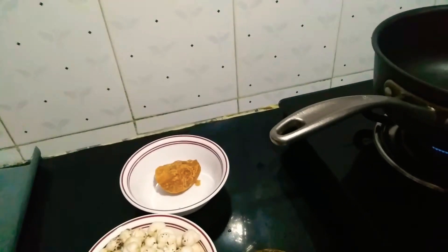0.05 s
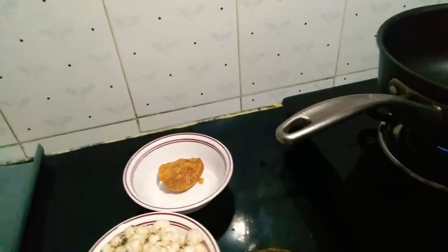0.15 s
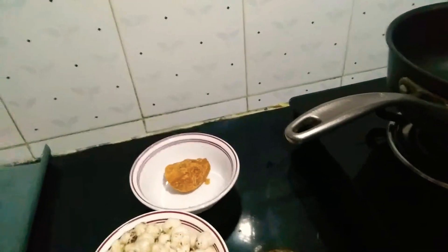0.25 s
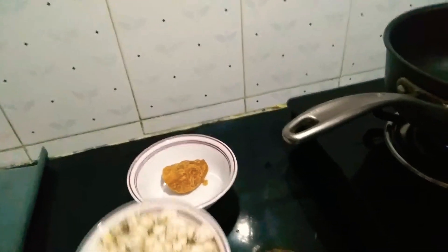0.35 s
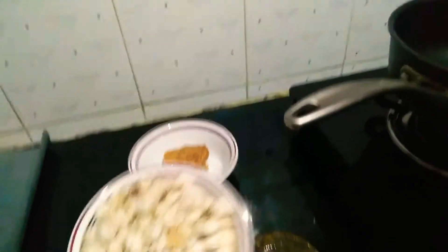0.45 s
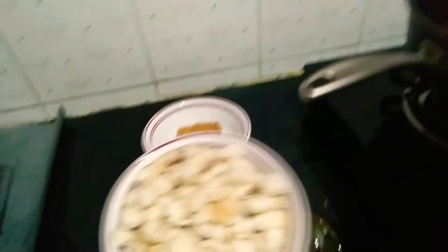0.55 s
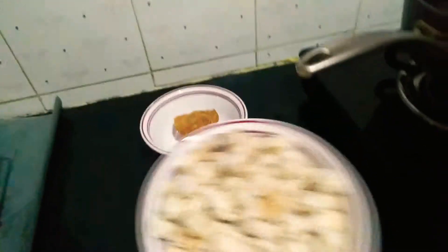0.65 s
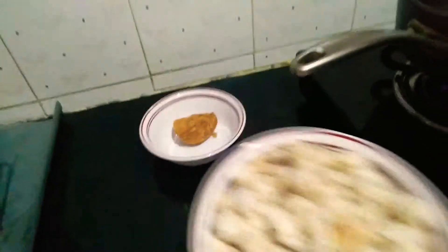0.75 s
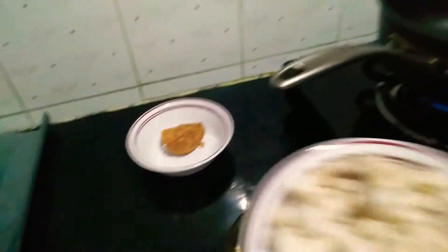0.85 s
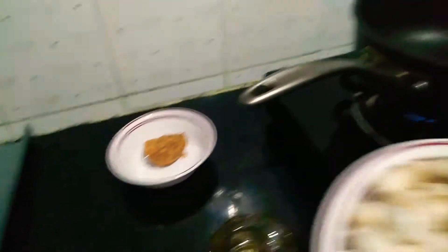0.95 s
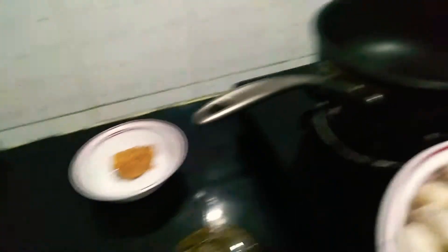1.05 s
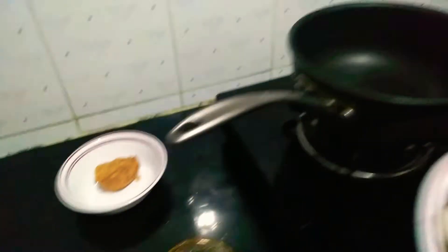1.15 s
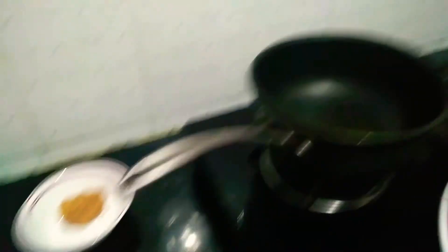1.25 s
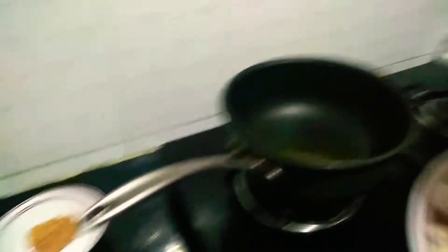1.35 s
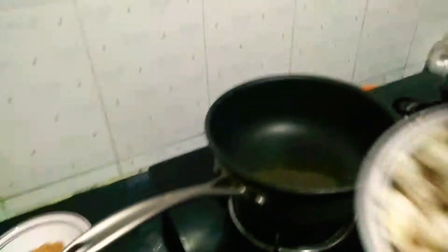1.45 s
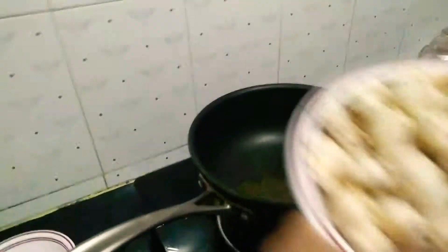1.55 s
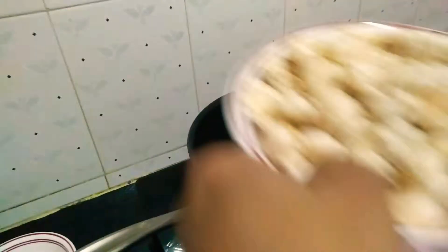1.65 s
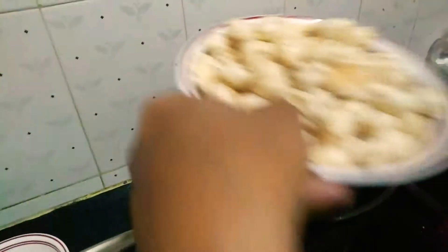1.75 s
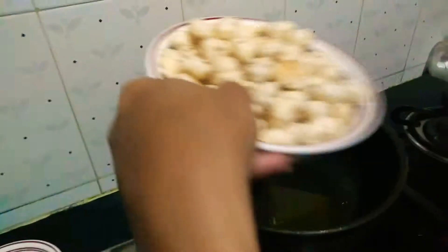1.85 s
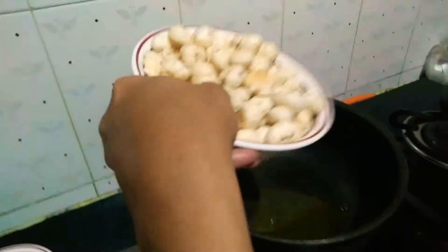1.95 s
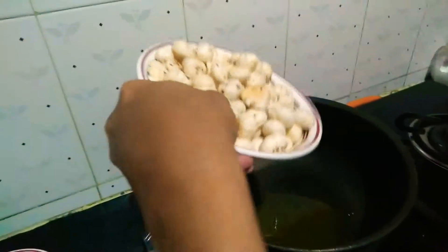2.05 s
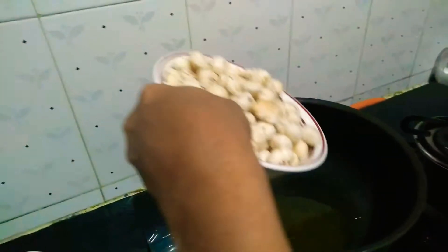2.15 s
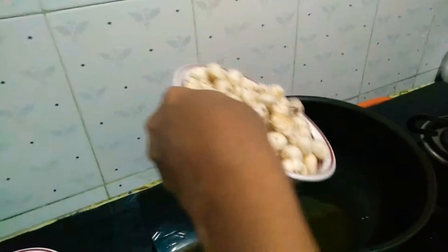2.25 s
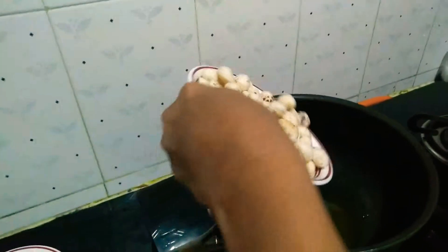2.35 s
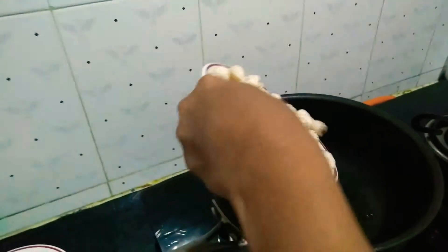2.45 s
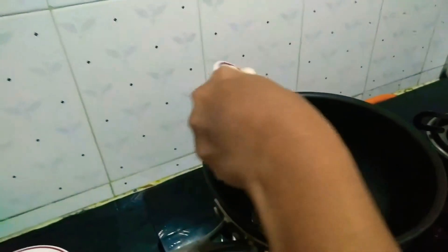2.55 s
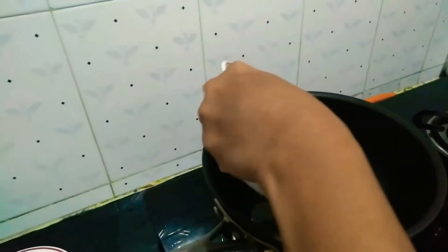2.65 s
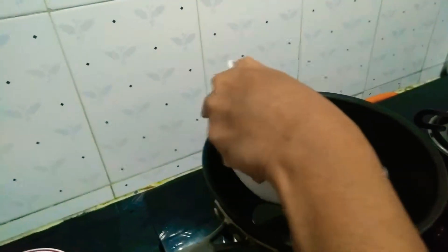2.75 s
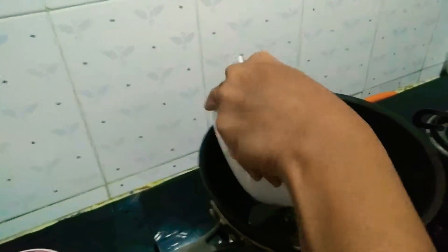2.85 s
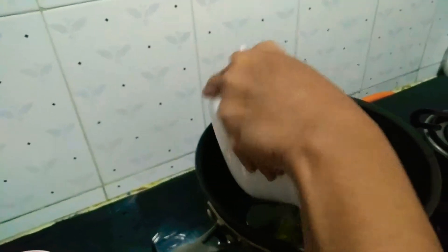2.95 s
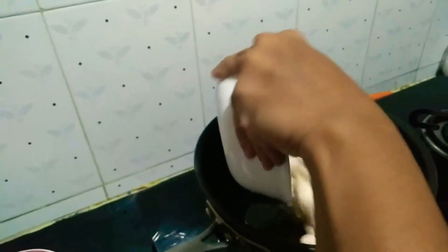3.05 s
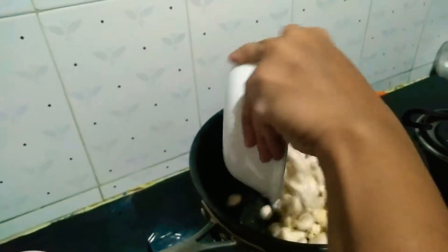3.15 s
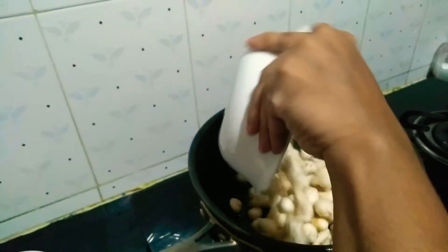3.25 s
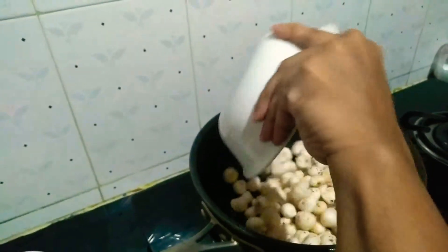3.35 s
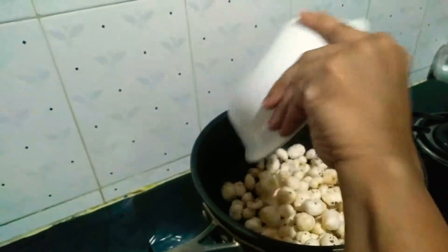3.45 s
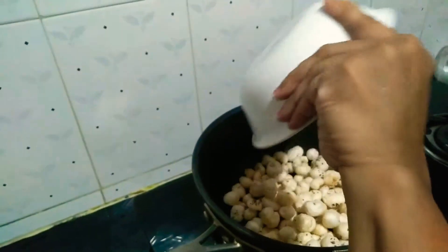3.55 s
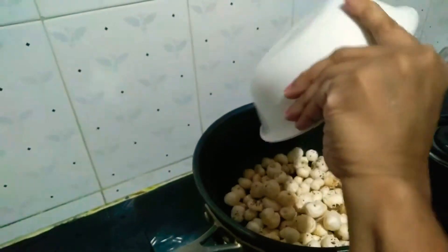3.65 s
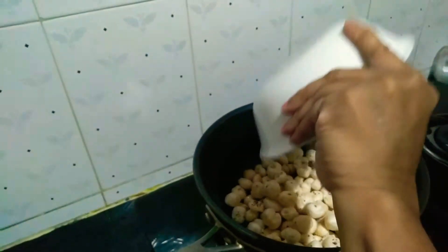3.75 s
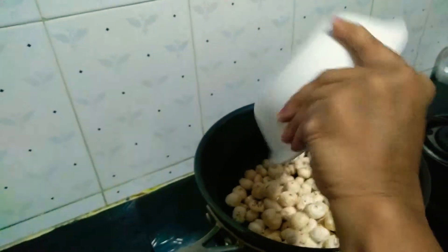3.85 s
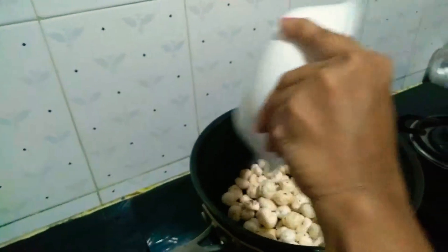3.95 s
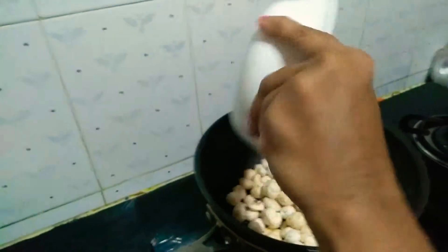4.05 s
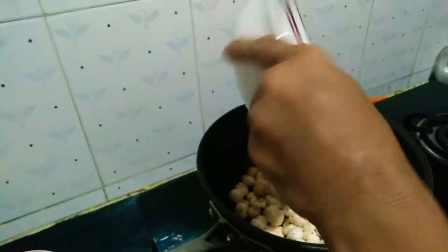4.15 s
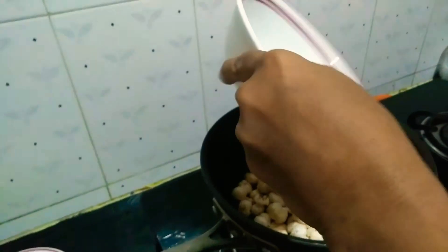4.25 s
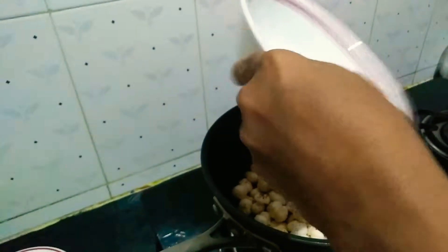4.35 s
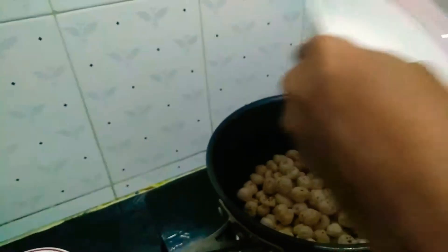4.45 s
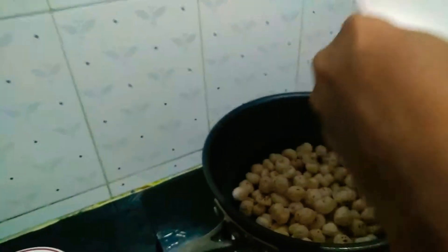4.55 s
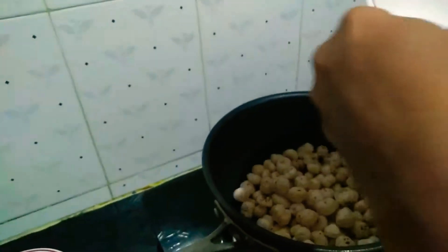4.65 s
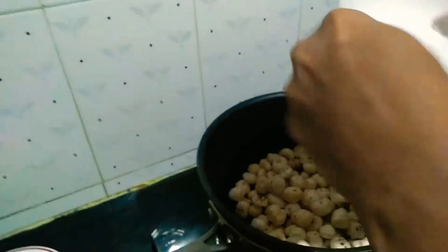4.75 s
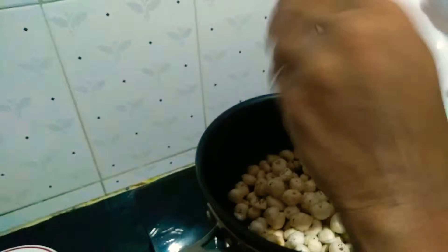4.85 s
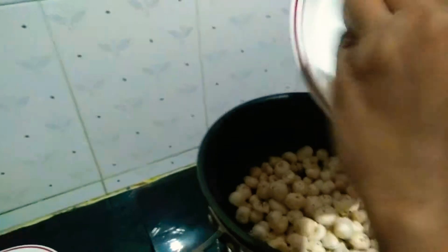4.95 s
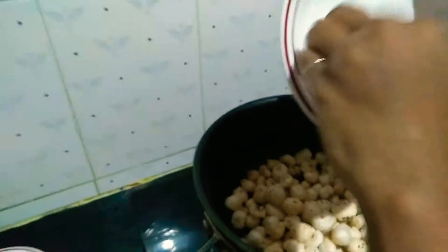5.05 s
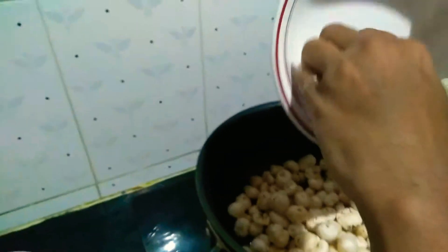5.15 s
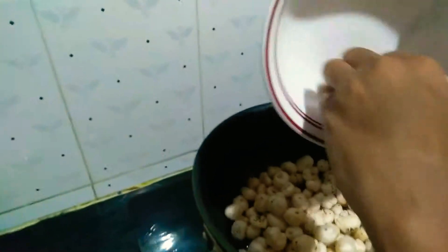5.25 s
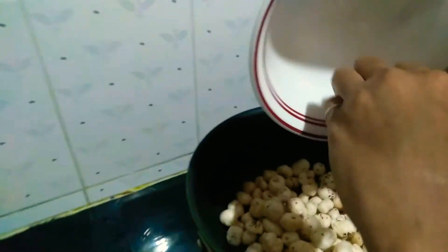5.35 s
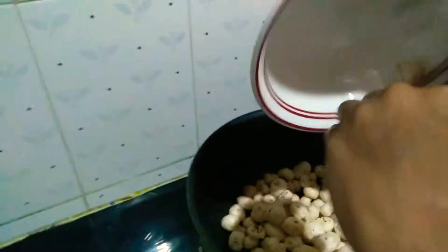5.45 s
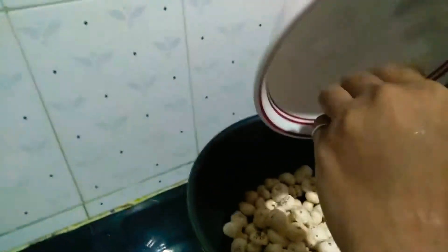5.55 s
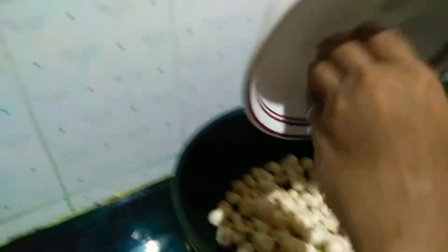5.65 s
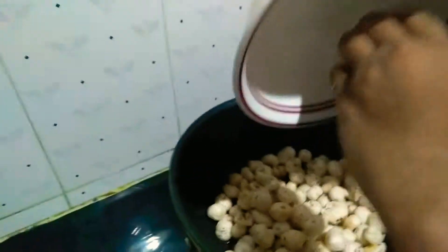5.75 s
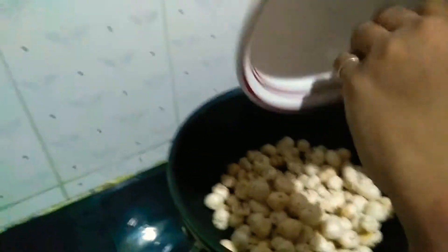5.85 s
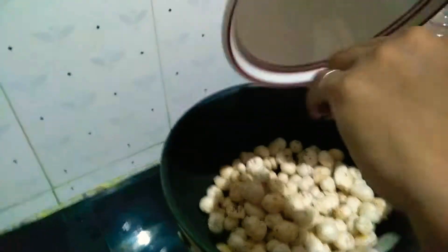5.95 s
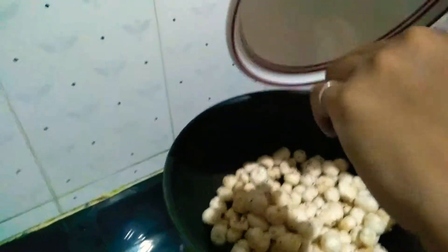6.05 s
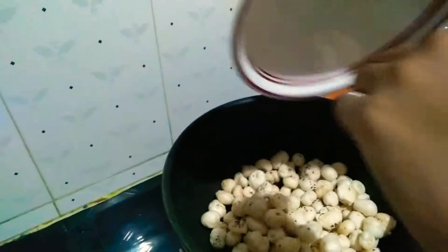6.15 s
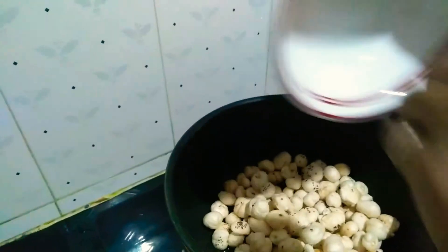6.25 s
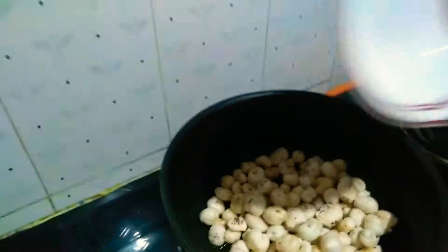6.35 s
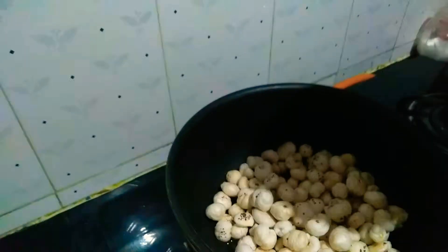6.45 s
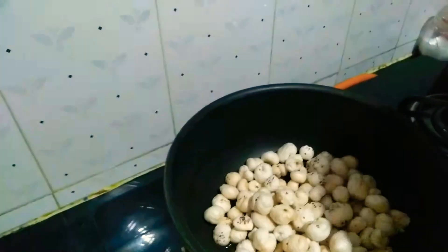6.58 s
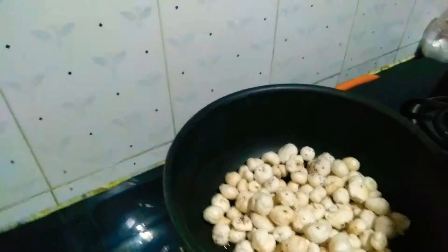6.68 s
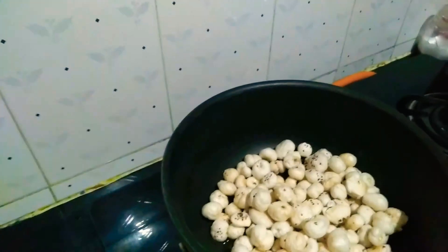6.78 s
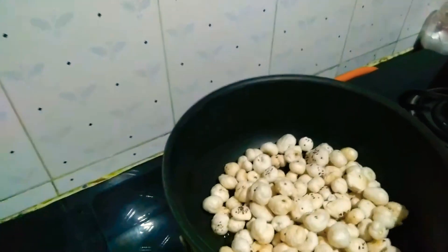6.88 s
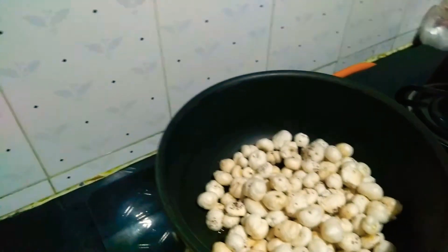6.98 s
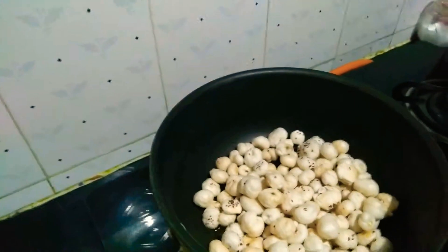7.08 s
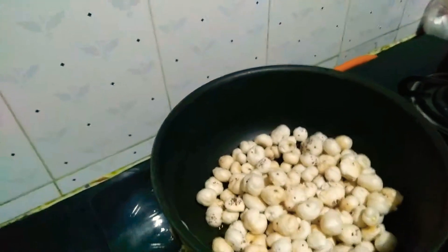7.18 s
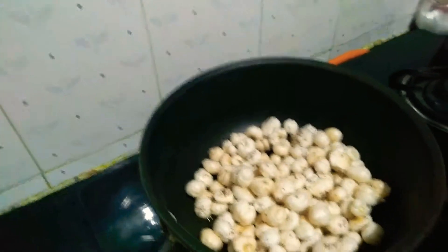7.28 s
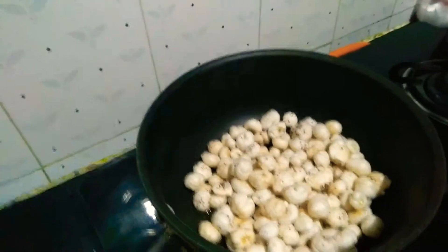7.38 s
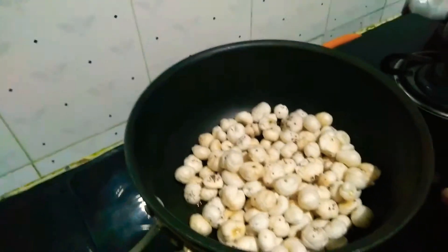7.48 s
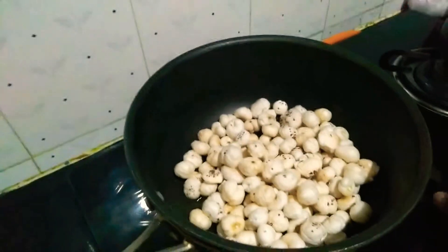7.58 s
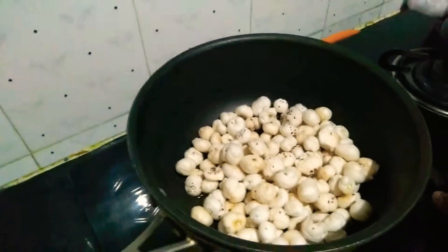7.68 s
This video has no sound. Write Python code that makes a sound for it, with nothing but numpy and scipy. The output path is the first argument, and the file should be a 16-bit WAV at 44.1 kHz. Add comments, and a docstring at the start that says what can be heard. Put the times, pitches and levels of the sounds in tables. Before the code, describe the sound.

A close handheld microphone in a small tiled kitchen with a short, bright echo. At about 0.1 s a full ceramic bowl clinks, damped and dull, with a brief rub; a softer tick comes near 0.4 s. Then it is quiet except for room air and a far engine heard through the walls, low soft thumps in uneven groups over faint rumble, continuing throughout. From 2.3 to 2.5 s the pan wall is tapped softly. At 2.6 s light puffed seeds pour into the metal pan: a dense, dry, hollow rattle with sharp cracks, fullest near 3.0 s with a bowl clink, duller as the heap covers the floor, thinning by 3.6 s. A clear rim clink rings at 3.95 s. Between 5.1 and 6.1 s come small bowl clinks, ticks, rim taps and short rubs. Faint gas hiss flickers in the later half; a faint rub and tick come near 7.4 s.

```python
"""Puffed seeds poured into a pan

A bowl of light puffed seeds is lifted off a kitchen counter and tipped into a metal pan; fingers then flick out
the last ones. Random impacts ring the modes of the pan floor, and short noise grains crackle in the heap.
Struck modes make the bowl and pan clink, and band noise makes the rubbing and the sharp cracks and ticks.
Flickering noise bands hiss as a gas flame, and low rung thumps over rumble are a far engine heard through the walls.
"""
import sys
import numpy as np
from scipy import signal
from scipy.fft import rfft, irfft
from scipy.io import wavfile
from scipy.ndimage import uniform_filter1d

SR = 44100
rng = np.random.default_rng(int(sys.argv[2]) if len(sys.argv) > 2 else 0)


def master_out(mix):
    """Clip the mix to full scale and print it as 16-bit PCM to the path in sys.argv[1]."""
    frames = np.transpose(np.atleast_2d(mix))
    ceiling = np.clip(frames, -1, 1)
    pcm = np.round(ceiling * 32767).astype(np.int16)
    wavfile.write(sys.argv[1], SR, pcm)


N = 340438  # length in samples

# Chugs of the far engine, singly or in groups, evenly spaced within each row. Each row: first beat in seconds,
# last beat in seconds, number of beats, first level in dB, last level in dB, pitch in Hz.
CHUG_GROUPS = [(.249, .371, 2, -47.5, -47, 226), (.566, .632, 2, -44.5, -43.5, 175),
               (.809, 0.98, 2, -41.5, -47, 147), (.955, 1.19, 4, -49.5, -39.5, 243),
               (1.302, 1.6, 2, -49, -47.5, 196), (1.495, 1.605, 2, -50, -51.5, 180.5),
               (1.677, 1.805, 2, -48.5, -46, 173), (1.879, 1.997, 3, -51.5, -49.5, 179),
               (2.055, 2.172, 3, -51, -46, 214), (2.369, 2.434, 2, -51.5, -44, 178),
               (2.5, 2.751, 5, -47.5, -51, 179), (3.041, 3.041, 1, -43, -45, 177),
               (3.59, 3.706, 2, -51.5, -54.5, 176), (3.897, 4.022, 3, -48, -46, 168.7),
               (4.156, 4.296, 2, -45, -45, 184), (4.426, 4.622, 4, -44, -44, 180),
               (4.692, 4.893, 4, -41.5, -45, 176.3), (4.961, 5.107, 3, -45.5, -44.5, 166.7),
               (5.19, 5.349, 3, -45.5, -44.5, 194.6), (5.472, 5.537, 2, -43.5, -41.5, 165),
               (5.68, 6.4, 3, -46.5, -44, 177), (5.975, 6.038, 2, -46, -39, 175),
               (6.102, 6.233, 3, -44.5, -46, 177), (6.386, 6.386, 1, -46.5, -48.5, 181),
               (6.52, 6.6, 2, -58.5, -48, 178), (6.716, 6.909, 4, -43.5, -43, 173.5),
               (6.972, 7.083, 2, -43, -42.5, 177.3), (7.143, 7.201, 2, -44.5, -52, 183),
               (7.265, 7.372, 3, -45.5, -45.5, 176.6), (7.49, 7.542, 2, -45.5, -43.5, 201)]
# Hollow knocks from the engine. Each row: the same columns as the chugs, with the band centre in Hz as pitch.
KNOCK_GROUPS = [(.25, .25, 1, -47.5, -52, 830), (.25, .371, 2, -52, -68, 400),
                (.508, .508, 1, -55.5, -58, 617), (1.112, 1.292, 3, -48, -59, 605),
                (1.362, 1.42, 2, -53, -59, 665), (1.743, 1.932, 4, -60.5, -61, 650),
                (4.092, 4.092, 1, -58.5, -58, 700), (4.164, 4.235, 2, -60.5, -56, 412),
                (4.703, 4.763, 2, -48, -56.5, 435), (5.121, 5.28, 3, -48, -57.5, 390),
                (5.475, 5.531, 2, -48, -51, 374), (5.81, 5.92, 2, -58, -55, 764),
                (5.46, 5.459, 1, -41, -46, 386), (5.68, 5.68, 1, -48, -53.5, 620),
                (5.91, 6.04, 2, -54, -44.5, 336), (6.791, 7.086, 6, -52, -55, 823),
                (7.554, 7.554, 1, -58.5, -61, 760)]
CHUG_SCATTER_DB, CHUG_SCATTER_HZ = 1, 1
# Engine rumble. Each row: time in seconds, level in dB.
RUMBLE_LEVEL = [(0.03, -66), (0.3, -79), (0.48, -75), (0.6, -55), (1.2, -62), (1.5, -69.5), (1.9, -56.5),
                (2.15, -68), (2.6, -57), (3.5, -84), (4.0, -63.5), (4.4, -68), (4.85, -59), (5.3, -71.5),
                (5.6, -53), (6.3, -63), (7.4, -58.5), (7.68, -69.5)]
# Gas hiss. Each row: time in seconds, level in dB.
FLAME_LEVEL = [(0.02, -74), (0.15, -72), (0.3, -110), (1.6, -92), (1.8, -85), (2.1, -100.5), (3.75, -79.5),
               (4.5, -77.5), (4.7, -73), (5.0, -79), (5.25, -73.5), (5.4, -71), (5.7, -75), (5.85, -67.5),
               (6.35, -81.5), (6.5, -70), (6.72, -66.5), (6.9, -75), (7.07, -69), (7.25, -77),
               (7.58, -67.5), (7.7, -69.5)]
# Spectrum of the room air. Each row: frequency in Hz, relative level in dB per Hz.
AIR_SPECTRUM = [(20, 2.5), (38, -14), (85, -4.5), (200, -3), (255, -6), (300, -21.5), (439, -25.5),
                (725, -26), (1160, -29.5), (8640, -38.5), (13500, -37), (15500, -39.5)]
AIR_DB = -65

# Modes of the bowl with seeds in it, then of the emptied bowl.
# Each row: frequency in Hz, relative level in dB, t60 in seconds.
FULL_BOWL_MODES = [(1049, -5, 0.08), (1182, 1.5, 0.055), (2170, 2, 0.061), (3160, -14, 0.074),
                   (3424, -1.5, 0.052), (5060, -3.5, 0.049), (7100, -2.5, 0.06)]
EMPTY_BOWL_MODES = [(1077, 9.5, 0.1), (2745, -1, 0.12), (3060, -20, 0.3), (5080, -1, 0.09),
                    (8340, -7, 0.12), (10540, -5, 0.088), (13200, -2, .08)]
# Modes of the pan wall, rim and floor. Each row: frequency in Hz, relative level in dB, t60 in seconds.
PAN_WALL_MODES = [(945, -7.5, 0.17), (1334, -5, 0.044), (1414, 4, 0.035), (1560, -0.5, 0.049),
                  (2980, -8.5, 0.042), (3093, -3.5, 0.2), (4900, -3, 0.04), (6900, -3, 0.033),
                  (10900, -8, 0.032), (12400, 7, 0.022)]
PAN_RIM_MODES = [(719.4, -5.5, 0.36), (870, -1.5, 0.44), (1144, -4, 0.27), (1260, -5.5, 0.095),
                 (1566, -6, 0.15), (2170, 16.5, 0.012), (3350, -6, 0.094)]
PAN_FLOOR_MODES = [(620, -17, 0.12), (1245, -16.5, 0.075), (1295, 6.5, 0.23), (2276, -6.5, 0.132),
                   (2347, -9, 0.14)]
# Blows on the bowl and the pan. Each row: start in seconds, ring level in dB, pitch the contact favours in Hz,
# its reach in octaves, clatter level in dB, clatter centre in Hz, clatter width in octaves, t60 of the contact
# in seconds.
FULL_BOWL_BLOWS = [(0.0611, -35.5, 2170, 1.18, -77, 3000, 1.5, 0.35),
                   (.068, -37.5, 1900, 1.3, -81, 3000, 2.0, 0.065),
                   (.093, -48, 1800, 1.3, -83, 3000, 2.0, 0.081),
                   (.12, -45, 1920, 0.69, -85, 3000, 2.0, 0.49),
                   (0.382, -45, 2424, 0.093, -72, 2420, 0.14, 0.16),
                   (1.137, -76, 7100, 0.34, -68.5, 6600, 0.66, 0.28)]
EMPTY_BOWL_BLOWS = [(3.097, -27, 5080, .2, -63, 5000, .5, 0.11),
                    (5.085, -44.5, 3670, 0.99, -66.5, 880, 0.93, 0.22),
                    (5.192, -47.5, 4830, 0.59, -86, 5230, 1.6, 0.26),
                    (5.215, -66, 9200, 0.42, -60.5, 7600, 0.23, 0.2),
                    (5.394, -48, 3060, 0.05, -79, 6700, 0.91, 0.27),
                    (5.556, -71, 8900, .5, -65, 7800, 0.48, 0.45),
                    (5.583, -80, 2780, 0.088, -65, 2080, 0.42, 0.39),
                    (5.658, -44.5, 4330, 0.84, -68, 6500, 0.9, 0.29),
                    (7.38, -65.5, 2980, 0.19, -67, 5940, 0.24, .1)]
PAN_WALL_BLOWS = [(2.285, -48, 2600, 1.12, -60.5, 1800, 1.5, 0.5),
                  (2.376, -45, 3670, 1, -66.5, 3910, 1.8, 0.42),
                  (2.519, -45, 1504, 0.8, -55, 1540, 1.8, 0.24)]
PAN_RIM_BLOWS = [(3.468, -46, 1250, .9, -46, 1880, 0.94, 0.14),
                 (3.839, -51, 1270, 0.22, -58.5, 1760, 4.2, 0.39),
                 (3.952, -29.5, 1324, 0.081, -52.5, 3270, 2.4, 0.3),
                 (4.003, -56, 1260, 0.06, -57.5, 1222, 0.21, 0.29),
                 (5.456, -53, 1600, 0.5, -51, 1140, 2.94, 0.35),
                 (5.975, -47.5, 1100, 0.4, -57, 1340, 0.9, 0.56),
                 (5.992, -46, 1270, 2.2, -55.5, 3380, 2.7, 0.38),
                 (6.125, -53.5, 1130, 0.6, -59.5, 2270, 1.9, 0.17)]
CONTACT_S = 0.00078  # time constant with which a blow sets in
# Skin and glaze rubbing. Each row: start in seconds, length in seconds, level in dB, start centre in Hz,
# end centre in Hz, width in octaves.
RUBBING_STROKES = [(.151, 0.1, -57.5, 1310, 980, 0.66), (.152, 0.11, -74.5, 6300, 6900, 0.53),
                   (5.345, 0.09, -74.5, 11200, 11200, 0.068), (5.816, 0.069, -61.5, 11200, 12400, 0.17),
                   (5.837, 0.049, -63, 1110, 2650, 0.48), (6.045, 0.046, -57, 6740, 6550, .21),
                   (7.487, 0.09, -67, 1200, 1310, 0.39), (7.499, 0.28, -66, 3001, 3026, 0.013),
                   (7.538, 0.11, -71, 3151, 3230, 0.53)]

# The stream of seeds. Each row: time in seconds, drive of the pan floor in dB, crackle level in dB.
POUR_LEVELS = [(2.57, -78.5, -69.5), (2.598, -57.5, -53), (2.61, -47, -56), (2.8, -46.5, -46.5),
               (3.03, -44, -41.5), (3.3, -47, -45.5), (3.5, -55, -51.5), (3.62, -93, -63),
               (3.8, -104, -100)]
# Seeds that land hard enough to ring the pan floor, first bare, then being covered.
# Each row: time in seconds, strength in dB.
HARD_LANDINGS = [(2.601, -20.5), (2.7028, -26), (2.7354, -23), (2.7643, -32.5), (2.7967, -20.5),
                 (2.8357, -25.5), (2.8546, -19), (2.89, -26.5), (2.9418, -26), (2.9925, -30),
                 (3.043, -26.5), (3.0976, -24.5), (3.127, -22.5), (3.1623, -24), (3.1987, -29),
                 (3.2218, -26)]
# Spectrum of the crackling heap. Each row: frequency in Hz, relative level in dB per Hz.
CRACKLE_SPECTRUM = [(240, -64), (400, -9.5), (445, -12), (623, -4.5), (1070, -9.5), (1280, 5),
                    (1490, -11.5), (2290, -6), (2920, -13), (5070, -18), (6190, -18), (8670, -24),
                    (12100, -23), (15500, -39)]
# Sharp cracks and ticks: seeds in the pour, later ticks with the blows on bowl and pan.
# Each row: start in seconds, peak in dB, centre in Hz, width in octaves.
CRACKS_AND_TICKS = [(2.6627, -45.5, 10700, 0.72), (2.726, -41.5, 6500, 0.55), (2.733, -42, 6600, .6),
                    (2.7625, -40, 4800, 0.78), (2.7815, -36.5, 9300, 0.64), (2.8318, -40, 6540, 0.69),
                    (2.8887, -40.5, 6470, 1.5), (2.9316, -31.5, 5900, 0.63), (2.9445, -34.5, 9000, 1.6),
                    (3.0204, -31, 6600, 0.64), (3.098, -30, 6000, 0.68), (3.136, -32, 6300, 0.84),
                    (3.2367, -35.5, 5900, 0.26), (3.255, -32, 6300, 0.31), (3.297, -34.5, 8000, 1.7),
                    (3.3714, -37, 6800, .6), (3.446, -44, 8000, 1.5), (3.4663, -34.5, 3600, 0.54),
                    (3.5356, -43, 7500, 2.4), (3.6042, -40.5, 5400, 1.1), (5.214, -50, 8500, 1.2),
                    (5.557, -49.5, 8000, 0.62), (5.583, -54, 7000, .8), (5.992, -44, 3000, 2.2)]
IMPACTS_PER_S = 900  # mean rate of the hail on the pan floor
LOAD_START_S, LOAD_END_S = 2.85, 3.25  # the heap starts to cover the pan floor, and has covered it
LOAD_DAMPS, LOAD_SAGS = 0.91, 0.0096  # share of the ring time left, share of the pitch lost
THIN_DULL = 0.37  # dB lost per octave above 4 kHz for each dB that the stream is under its fullest

ROOM_T60_S, ROOM_DB = 0.24, -9.5
MIC_HZ, MIC_DB = 6300, -1.5  # resonance of the microphone port
TOP_HZ = 15600  # where the microphone cuts off


def undb(db):
    """Decibels to gain."""
    return 10 ** (np.asarray(db) / 20)


def unit(x):
    """Scale to rms 1."""
    return x / np.sqrt(np.mean(x ** 2))


def curves(table):
    """Columns of a table, drawn as straight lines over every sample."""
    s, *columns = np.transpose(table)
    return [np.interp(np.arange(N) / SR, s, column) for column in columns]


def clicks(s, size):
    """Impulses at given times."""
    return np.bincount(np.clip((np.asarray(s) * SR).astype(int), 0, N - 1), size, N)


def ring(x, hz, t60):
    """One mode as a two-pole resonator; a unit impulse starts a decaying sine of about height 1."""
    radius = np.exp(-np.log(1000) / (max(t60, .002) * SR))
    w = 2 * np.pi * hz / SR
    return signal.lfilter([0, np.sin(w)], [1, -2 * radius * np.cos(w), radius * radius], x)


def band(x, hz, octaves):
    """Band-pass around a centre."""
    edges = hz * 2 ** (np.array([-.5, .5]) * max(octaves, .02))
    edges = np.clip(edges, 15, .45 * SR)
    return signal.sosfilt(signal.butter(2, edges, "bandpass", fs=SR, output="sos"), x)


def colour(x, table):
    """Causal filter from (Hz, dB) points, by the cepstrum of the log gain."""
    hz, db = np.transpose(table)
    grid_hz = np.linspace(1, SR / 2, 2049)
    log_gain = np.interp(np.log(grid_hz), np.log(hz), db) * np.log(10) / 20
    cepstrum = irfft(log_gain)
    # folding the cepstrum forward gives minimum phase
    cepstrum[1:2048] *= 2
    cepstrum[2049:] = 0
    return signal.fftconvolve(x, irfft(np.exp(rfft(cepstrum))))[:len(x)]


def add(out, s, x):
    """Mix a sound in at a time."""
    i = int(s * SR)
    out[i:i + len(x)] += x[:N - i]


def walk(rate):
    """Random levels held 1 / rate s and slewed twice."""
    k = int(SR / rate)
    steps = np.repeat(rng.standard_normal(N // k + 1), k)
    return 1.1 * uniform_filter1d(uniform_filter1d(steps, k), k)[:N]


def hail(per_s, scatter_db):
    """Random impacts of very uneven size, at rms 1."""
    hits = rng.random(N) < per_s / SR
    return unit(hits * rng.standard_normal(N) * undb(scatter_db * rng.exponential(size=N)))


def beats_of(table, scatter_db, scatter_hz):
    """Unfold each row into evenly spaced (s, dB, Hz) beats, with level and pitch each a little off."""
    beats = np.vstack([np.linspace((first, db, hz), (last, end_db, hz), round(count))
                       for first, last, count, db, end_db, hz in table])
    return beats + rng.standard_normal((len(beats), 3)) * (0, scatter_db, scatter_hz)


def struck(modes, blows, chatter, twin_db, twin_share):
    """Each blow cracks, chatters against the modes near the pitch it favours and throws clatter that dies away."""
    out, t = np.zeros(N), np.arange(SR // 2) / SR
    chance = rng.standard_normal((len(blows), 3, len(t)))
    rise = 1 - np.exp(-t / CONTACT_S)
    crack = 3.8 * np.exp(-t / .0015)
    push = 0.41 * (t == 0)
    for blow, (rattle, rock, noise) in zip(blows, chance):
        s, ring_db, near_hz, reach, clatter_db, clatter_hz, octaves, t60 = blow
        fade = 1000 ** (-t / max(t60, .01))
        contact = chatter * fade
        rings = 0
        for hz, mode_db, mode_t60 in modes:
            # a round vessel is never true: each mode has a twin slightly off
            pair = ring(push + rattle * contact, hz, mode_t60)
            pair = pair + undb(twin_db) * ring(push + rock * contact, hz * (1 + twin_share), mode_t60)
            # modes far from the favoured pitch are hit less
            away_db = 6 * (np.log2(hz / near_hz) / max(reach, .05)) ** 2
            rings = rings + undb(ring_db + mode_db - away_db) * pair
        clatter = undb(clatter_db) * unit(band(noise, clatter_hz, octaves)) * (crack + fade)
        add(out, s, rise * (rings + clatter))
    return out


def rumble():
    """Low noise, band-passed twice, whose level wanders about a drawn curve."""
    low = band(band(rng.standard_normal(N), 85.3, octaves=.9), 85.3, octaves=.9)
    return undb(curves(RUMBLE_LEVEL)[0] + 2.1 * walk(12)) * unit(low)


def engine():
    """Each chug is a soft low thump that also rings a wall; knocks are fading band noise and rumble lies beneath."""
    out, t = np.zeros(N), np.arange(SR // 5) / SR
    push, swell = 1. * (t == 0), 1 - np.exp(-t / 0.0086)
    chugs = beats_of(CHUG_GROUPS, CHUG_SCATTER_DB, CHUG_SCATTER_HZ)
    knocks = beats_of(KNOCK_GROUPS, CHUG_SCATTER_DB, CHUG_SCATTER_HZ)
    for (s, db, hz), noise in zip(chugs, rng.standard_normal((len(chugs), len(t)))):
        thump = ring(push, hz, 0.12)
        thump += undb(-11.5) * ring(push, 176.5, 0.39) + undb(-14.0) * ring(push, 262.6, 0.12)
        # loose things shake along for a moment
        thump += undb(-15.0) * 1000 ** (-t / 0.11) * unit(band(noise, 240, octaves=0.48))
        add(out, s - .003, undb(db + 2.5) * swell * thump)
    for (s, db, hz), noise in zip(knocks, rng.standard_normal((len(knocks), len(t)))):
        knock = 1000 ** (-t / 0.13) * unit(band(noise, hz, octaves=0.19))
        add(out, s - .002, undb(db - 4.0) * swell * knock)
    return out + rumble()


def hiss_patch(hz, octaves, grit):
    """Noise with sparse grit, band-passed twice to a narrow patch."""
    noise = rng.standard_normal(N) + grit * hail(400, scatter_db=3.5)
    return unit(band(band(noise, hz, octaves), hz, octaves))


def flame():
    """Grainy gas hiss in flickering patches near the microphone resonance; a stronger flow lifts the top bands more."""
    flow_db = curves(FLAME_LEVEL)[0]
    hiss = sum(hiss_patch(hz, 0.21, grit=.5) * undb(db + 3.2 * walk(30))
               for hz, db in [(5500, -13), (6150, -4), (6800, -3)])
    top = sum(hiss_patch(hz, octaves, grit=.2) * undb(4.7 * walk(11))
              for hz, octaves in [(9300, .08), (10400, 0.097), (12000, .2)])
    return hiss * undb(flow_db + 1.5 * walk(26)) + top * undb(-89 + 1.6 * (flow_db + 71.0))


def room_air():
    """Coloured noise whose level wanders slightly."""
    return undb(AIR_DB + 2.3 * walk(9.7)) * unit(colour(rng.standard_normal(N), AIR_SPECTRUM))


def full_bowl():
    """The bowl clinks on short modes, damped by its seeds."""
    return struck(FULL_BOWL_MODES, FULL_BOWL_BLOWS, chatter=0.0091, twin_db=-5.5, twin_share=-0.033)


def rubs():
    """Band noise of skin and glaze that swells and fades while its colour slides."""
    out = np.zeros(N)
    for s, length, db, start_hz, end_hz, octaves in RUBBING_STROKES:
        share = np.linspace(0, 1, int(length * SR))
        noise = rng.standard_normal((2, len(share)))
        # an equal-power fade from the first band to the second
        slide = np.sqrt(1 - share) * unit(band(noise[0], start_hz, octaves))
        slide += np.sqrt(share) * unit(band(noise[1], end_hz, octaves))
        add(out, s, undb(db) * slide * np.sin(np.pi * share ** 0.66))
    return out


def pan_wall():
    """Blows on the pan wall ring its mostly short modes."""
    return struck(PAN_WALL_MODES, PAN_WALL_BLOWS, chatter=0.019, twin_db=-3.0, twin_share=-.03)


def pan_floor(drive_db, on):
    """A dense random hail and single hard landings ring the floor modes, which a growing heap damps and lowers."""
    hard = clicks(*np.transpose([(s, undb(db)) for s, db in HARD_LANDINGS]))
    strike = undb(-9.5) * band(hard, 2390, octaves=1.56)
    strike += undb(-26.0) * on * undb(drive_db) * hail(IMPACTS_PER_S, scatter_db=1.5)
    # a puffed seed is soft: the push lasts a fraction of a millisecond
    strike = uniform_filter1d(strike, size=9)
    load = np.interp(np.arange(N) / SR, (LOAD_START_S, LOAD_END_S), (0, 1))
    out = np.zeros(N)
    for hz, db, t60 in PAN_FLOOR_MODES:
        bare = ring(strike * (1 - load), hz, t60)
        covered = ring(strike * load, hz * (1 - LOAD_SAGS), t60 * LOAD_DAMPS) / np.sqrt(LOAD_DAMPS)
        out += undb(db) * (bare + covered)
    return out


def heap_crackle(crackle_db, on, fade):
    """Seeds differ in size, so each share of them clicks in its own band and fizzes for a few milliseconds."""
    grains = 0
    ticks = 0.3 * np.abs(hail(IMPACTS_PER_S / 12, scatter_db=0.5))  # hard hits sound in all bands at once
    for hz in 500 * 2 ** np.arange(0, 5, .7):
        hits = np.abs(hail(IMPACTS_PER_S / 6, scatter_db=2.0)) + ticks
        bursts = unit(signal.fftconvolve(hits, fade)[:N])
        dull_db = THIN_DULL * (crackle_db - crackle_db.max()) * max(np.log2(hz / 4000), 0)
        grain = unit(band((bursts + 0.65) * rng.standard_normal(N), hz, octaves=1.0))
        grains = grains + np.sqrt(hz) * undb(dull_db) * grain
    heap = colour(grains, CRACKLE_SPECTRUM)
    return on * undb(crackle_db + 3.5) * heap / np.std(heap[on])


def heap_slide(crackle_db, on):
    """The heap sliding as a whole, as wide noise, drums the bowl of the pan in one low mode."""
    slide = hail(IMPACTS_PER_S, scatter_db=0.5) + rng.standard_normal(N)
    wide = undb(crackle_db - 9.0) * unit(band(slide, 551.5, octaves=6.2))
    drum = undb(crackle_db - 11.0) * unit(ring(slide, 368, .14))
    return on * (wide + drum)


def cracks_and_ticks(fade):
    """Each crack or tick is a sharp snap of band noise, then a fizz."""
    out = np.zeros(N)
    chance = rng.standard_normal((len(CRACKS_AND_TICKS), len(fade)))
    for (s, db, hz, octaves), noise in zip(CRACKS_AND_TICKS, chance):
        crack = band(noise * (fade ** 2.6 + .2 * fade ** 0.67), hz, octaves)
        add(out, s, undb(db) * crack / np.abs(crack).max())
    return out


def pour_and_ticks():
    """The pour rings the pan floor, crackles and slides as a heap; sharp cracks stand out, and ticks come later."""
    drive_db, crackle_db = curves(POUR_LEVELS)
    t = np.arange(N) / SR
    on = (t > POUR_LEVELS[0][0]) & (t < POUR_LEVELS[-1][0])
    fade = np.exp(-np.arange(900) / SR / 0.0036)
    out = pan_floor(drive_db, on) + heap_crackle(crackle_db, on, fade)
    return out + heap_slide(crackle_db, on) + cracks_and_ticks(fade)


def empty_bowl():
    """The emptied bowl clinks on longer, brighter modes."""
    return struck(EMPTY_BOWL_MODES, EMPTY_BOWL_BLOWS, chatter=0.014, twin_db=-6.5, twin_share=.007)


def pan_rim():
    """Blows on the pan rim ring its modes."""
    return struck(PAN_RIM_MODES, PAN_RIM_BLOWS, chatter=0.016, twin_db=-6.5, twin_share=0.0148)


def room(near):
    """Tiled walls answer after a few milliseconds with a smooth noise tail."""
    t = np.arange(SR // 2) / SR
    tail = rng.standard_normal(len(t)) * 1000 ** (-t / ROOM_T60_S) * (t > .004)
    return undb(ROOM_DB) * signal.fftconvolve(near, tail / np.linalg.norm(tail))[:N]


def scene():
    """Close sounds in a tiled kitchen over engine, flame and air."""
    near = full_bowl() + rubs() + pan_wall() + pour_and_ticks() + empty_bowl() + pan_rim()
    # the microphone port rings with close, bright sounds
    near += undb(MIC_DB) * band(near, MIC_HZ, octaves=0.45)
    return (near + room(near) + engine() + flame() + room_air())[None]


def record(dry):
    """The microphone cuts the top with a steep low-pass."""
    return signal.sosfilt(signal.ellip(10, .2, 70, TOP_HZ, fs=SR, output="sos"), dry)


dry = scene()
out = record(dry)
master_out(out)
```